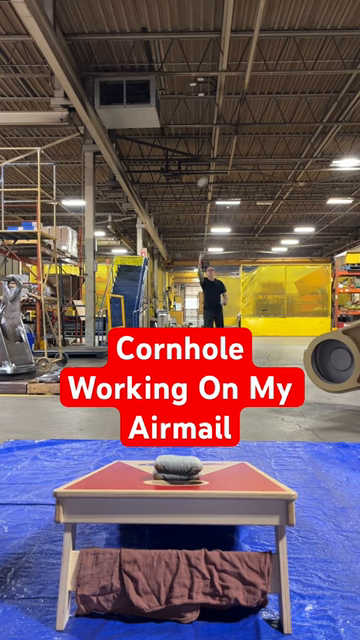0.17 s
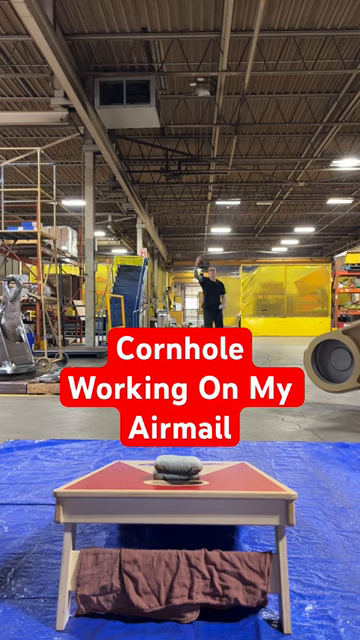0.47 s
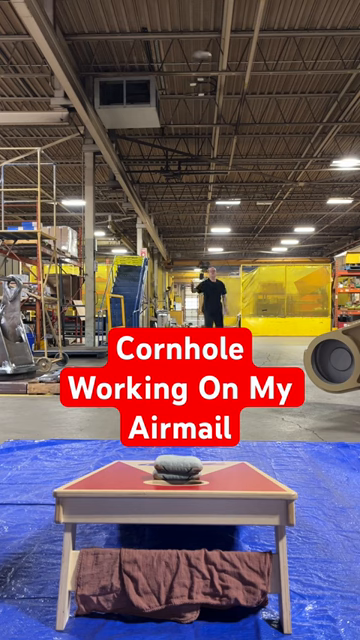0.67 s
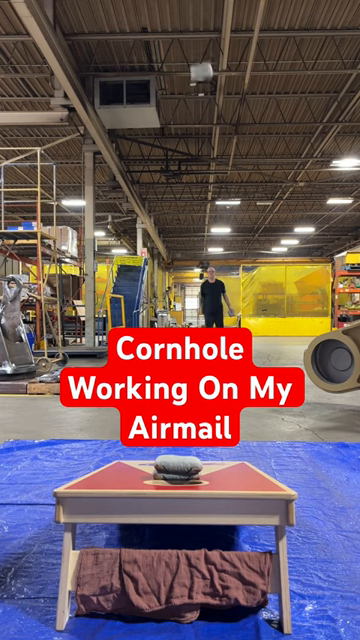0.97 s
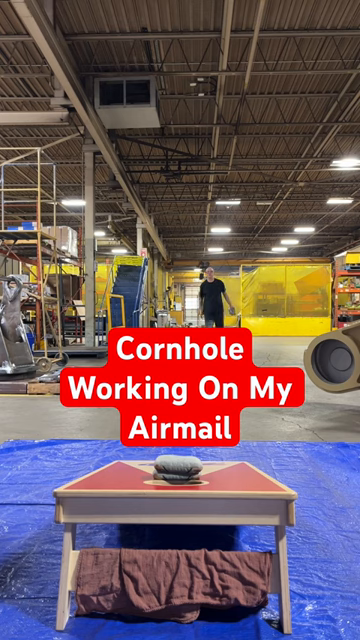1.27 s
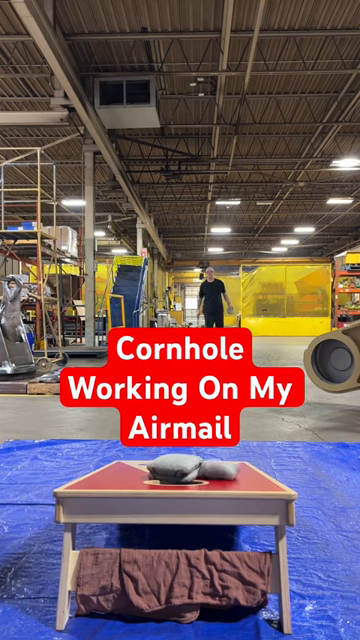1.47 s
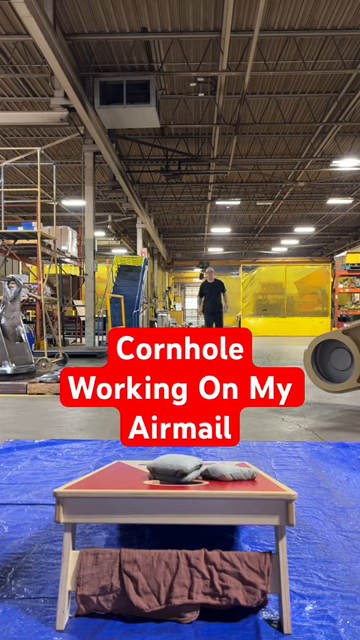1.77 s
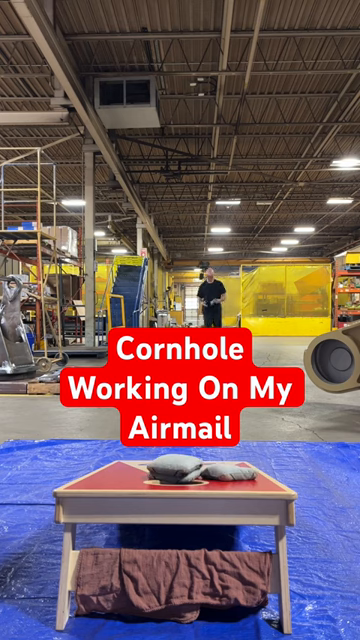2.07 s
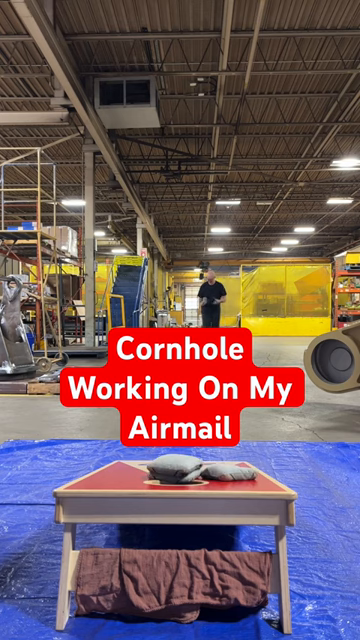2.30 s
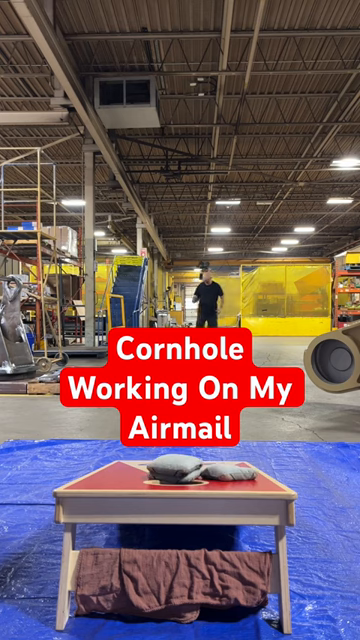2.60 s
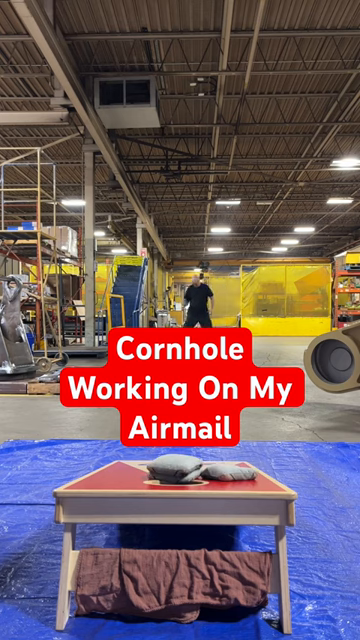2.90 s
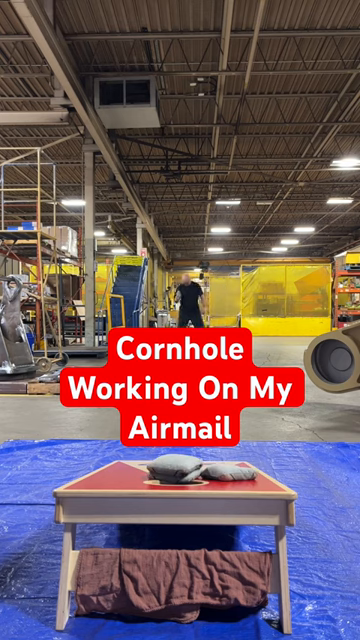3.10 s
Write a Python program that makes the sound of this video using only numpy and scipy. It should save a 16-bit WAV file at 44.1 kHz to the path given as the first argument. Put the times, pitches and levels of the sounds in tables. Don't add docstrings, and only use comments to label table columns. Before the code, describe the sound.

Steady ventilation rumble and airy rush fill a large warehouse; then one loud, woody beanbag thud lands close to a stereo phone, flops flat, and reverberates briefly before the fan noise continues alone.

```python
import sys
import numpy as np
from scipy import signal
from scipy.fft import rfft, irfft, next_fast_len
from scipy.io import wavfile
from scipy.ndimage import uniform_filter1d, map_coordinates

SR = 44100
rng = np.random.default_rng(int(sys.argv[2]) if len(sys.argv) > 2 else 0)


def int16_out(signal):
    q = np.round(np.clip(np.atleast_2d(signal).T, -1, 1) * 32767)
    wavfile.write(sys.argv[1], SR, q.astype(np.int16))


def ratio(d):
    e = np.asarray(d, float) / 20
    return 10 ** e


N = 143325


def unit(x):
    return x / np.sqrt(np.mean(x ** 2) + 1e-20)


def along(points, hz):
    f, v = np.transpose(points)
    return np.interp(np.log(hz + 1), np.log(f + 1), v)


def wobble(rate_hz):
    knots = rng.standard_normal(int(N * rate_hz / SR) + 4)
    return map_coordinates(knots, [np.arange(N) * rate_hz / SR])


def filtered(x, response):
    m = next_fast_len(N + SR // 2)
    return irfft(rfft(x, m) * response(np.fft.rfftfreq(m, 1 / SR)), m)[..., :N]


def rush(spectrum, level_db, patchy_db):
    z = signal.stft(rng.standard_normal(N + 512), nperseg=512)[2]
    field = uniform_filter1d(rng.standard_normal(z.shape), size=6, axis=0)
    field = uniform_filter1d(field, size=14, axis=1)
    noise = signal.istft(z * ratio(patchy_db * unit(field)), nperseg=512)[1][:N]
    return ratio(level_db) * unit(filtered(noise, lambda hz: ratio(along(spectrum, hz))))


def duct_drones():
    # pitch_hz, width_hz, level_db
    ducts = [(56.1, 3.3, -32), (80.1, 6, -35), (115.8, 11.5, -41.5), (289.4, 49, -46), (577, 114, -42),
             (2120, 230, -54.5)]
    drone = np.zeros(N)
    for pitch_hz, width_hz, level_db in ducts:
        noise = rng.standard_normal(N)
        mode = filtered(noise, lambda f: 1 / (1 + (2 * (f - pitch_hz) / width_hz) ** 4))
        drone += ratio(level_db) * unit(mode)
    return drone * ratio(2.2 * wobble(2.8))


def motor_whine():
    level_db = -42 + 2.5 * wobble(6)
    return ratio(level_db) * np.sin(2 * np.pi * 1313 * np.arange(N) / SR + 0.4 * wobble(8))


def fans():
    # frequency_hz, density_db (per Hz)
    rumble = [(12, -68), (28, -34), (36, -7.5), (52, -4.5), (75, 0.5), (123, -4), (220, -15), (400, -120)]
    air = [(120, -20.5), (200, -6), (247, -6), (302, -1), (580, -3.5), (729, -5), (2120, -14),
           (4890, -25.5), (7600, -39.5), (9880, -114), (16700, -120)]
    hiss = [(7000, -120), (8000, -40), (9000, -11.5), (10000, -0.5), (12700, -3.5), (14000, -9),
            (14500, -16), (14800, -120)]
    # frequency_hz, density_db (per Hz)
    rumble_side = [(20, -51), (145, 0), (296, -7), (400, -2), (770, -1), (1100, -4.5), (1640, -3.5),
                   (1800, -62)]
    air_side = [(1200, -60), (1600, -4.5), (3030, -8), (4950, -20), (6530, -22.5), (8000, -25),
                (10300, -31), (11000, -58)]
    hiss_side = [(12300, -120), (13000, -12), (13800, -2), (14400, 0), (14900, -6), (15600, -6),
                 (15900, -37)]
    # frequency_hz, share
    lean = [(150, -0.035), (700, 0.16), (1300, -0.013), (2300, 0.24), (4000, 0.48), (6500, 0.41),
            (7600, -0.097)]
    mid = rush(rumble, -24.5, 0.92) * ratio(1.3 * wobble(3.83)) + duct_drones()
    mid = mid + rush(air, -31, 0.96) + rush(hiss, -65.5, 0.4)
    side = rush(rumble_side, -32.5, 0.49) + rush(air_side, -43.5, 0.6) + rush(hiss_side, -73, 0.4)
    side = side + motor_whine()
    side = side + filtered(mid, lambda hz: along(lean, hz) * (hz < 7600))
    return np.array([mid + side, mid - side])


def answer(x, t60, gap_s):
    # frequency_hz, correlation
    alike = [(150, 1), (400, 0.32), (900, 0)]
    hz, t, z = signal.stft(rng.standard_normal((2, SR * 2)), SR, nperseg=256)
    turn = np.arccos(np.clip(along(alike, hz), -1, 1))[:, None] / 2
    mid, side = z * ratio(-60 * t / t60(hz)[:, None]) * [np.cos(turn), np.sin(turn)]
    tail = signal.istft(np.array([mid + side, mid - side]), SR, nperseg=256)[1]
    tail = tail / np.linalg.norm(tail[0])
    delayed = np.pad(x, (round(gap_s * SR), 0))
    return signal.fftconvolve(delayed[None], tail, axes=1)[:, :N]


def near_reflections(thud):
    return ratio(-10.5) * answer(thud, lambda hz: 0.067 + 0 * hz, 0.0066)


def hall(thud, rattle):
    # frequency_hz, t60_s
    decay = [(150, 0.98), (500, 1.13), (1500, 1.9), (4000, 0.83), (9000, 0.7)]
    # frequency_hz, level_db
    colour = [(100, 4), (300, 0.5), (1000, 2), (2500, 10.5), (4500, 12.5), (6500, 3), (10000, -15),
              (11500, -58)]
    blow = filtered(thud + rattle.mean(0), lambda hz: ratio(along(colour, hz)))
    return ratio(-3.5) * answer(blow, lambda hz: along(decay, hz), 0.03)


def grains(rows, colour, colour_side, spiky_db):
    t = np.arange(N) / SR
    swell = np.zeros(N)
    for start_s, rise_s, hold_s, t60_s, level_db in rows:
        fading_s = np.maximum(t - start_s - rise_s - hold_s, 0)
        swell += ratio(level_db - 60 * fading_s / t60_s) * np.clip((t - start_s) / rise_s, 0, 1) ** 1.3
    clicks = rng.standard_normal((2, N)) * ratio(spiky_db * rng.standard_normal(N))
    mid, side = filtered(clicks, lambda hz: ratio([along(colour, hz), along(colour_side, hz)]))
    return swell * unit(np.array([mid + side, mid - side]))


def dull_scuffs():
    # start_s, rise_s, hold_s, t60_s, level_db
    scuffs = [
        (1.317, .004, 0.0038, 0.034, -26.5),
        (1.345, .008, 0.011, 0.045, -48),
        (1.3765, 0.0025, 0.0062, .04, -30),
        (1.401, .003, 0.007, .05, -38),
    ]
    # frequency_hz, level_db
    dull = [(700, -62), (1300, 5.5), (2200, 1.5), (3500, -6), (5500, -12.5), (7000, -23), (8200, -80)]
    dull_side = [(700, -60), (1200, -1), (2200, -4), (3500, -7), (6000, -18), (9500, -32), (10500, -80)]
    return grains(scuffs, dull, dull_side, 6.2)


def pellet_rattle():
    # start_s, rise_s, hold_s, t60_s, level_db
    rattles = [
        (1.315, .004, 0.0052, .005, -25.5),
        (1.3213, 0.00029, 0.0014, .004, -22.5),
        (1.325, .002, 0.0044, .01, -47),
        (1.336, 0.0047, 0.021, 0.14, -55),
    ]
    # frequency_hz, level_db
    pellets = [(900, -120), (1300, 16.5), (5200, -12.5), (7000, 0), (8400, -19), (10200, 1), (13600, 2.5),
               (14700, -58)]
    pellets_side = [(900, -120), (1300, -5), (4000, -6), (8500, -1), (10800, -2), (12200, -50), (13300, -6),
                    (15300, -7)]
    return grains(rattles, pellets, pellets_side, 2.5)


def flop():
    u = np.clip((np.arange(N) / SR - 1.3768) / 0.0078, 0, 1)
    pitch_hz = 1300 * (270 / 1300) ** u * (u > 0)
    return ratio(-5.5) * np.sin(np.pi * u) * np.sin(2 * np.pi * np.cumsum(pitch_hz) / SR)


def sag(t):
    pitch_hz = np.maximum(290 - 1710 * t, 200)
    tone = np.sin(2 * np.pi * np.cumsum(pitch_hz) / SR) * (1 - np.exp(-t / 0.002))
    return ratio(-11 - 60 * t / 0.22) * tone


def board():
    # start_s, level_db, pitch_hz (of the thump), push (direction, +1 or -1)
    contacts = [(1.3179, -11, 750, 1), (1.3209, -11.5, 330, -1), (1.3228, -1.5, 329, 1),
                (1.3305, 1.5, 528, 1), (1.3334, -3.5, 380, 1), (1.3490, -19, 500, 1),
                (1.3600, -10, 306, -1), (1.3841, -2, 492, 1), (1.3938, -10, 270, -1), (1.414, -17, 198, 1)]
    # pitch_hz, level_db, t60_s
    modes = [(228, -4.5, 0.117), (305, 1.5, 0.062), (608, -8.5, 0.038), (799, 0.5, 0.053),
             (984, -13, 0.043), (1304, -12, .04), (1520, -22, .03), (2210, -18, 0.044)]
    thump_cycles = 1.55
    ring_db, longest_t60_s, soft_s = -11, 0.07, 0.00036
    out, t = np.zeros(N + SR), np.arange(SR // 2) / SR
    spot_db = rng.normal(0, 2, (len(contacts), len(modes)))
    for (start_s, level_db, pitch_hz, push), own_db in zip(contacts, spot_db):
        blow = 1.53 * np.sin(2 * np.pi * pitch_hz * t) * ratio(-20 * t * pitch_hz / thump_cycles)
        for (mode_hz, mode_db, t60_s), extra_db in zip(modes, own_db):
            t60_s = min(t60_s, longest_t60_s * 800 / mode_hz)
            decay_db = ring_db + mode_db + extra_db - 60 * t / t60_s
            blow += ratio(decay_db) * np.sin(2 * np.pi * mode_hz * t)
        rise = 1 - np.exp(-(t / soft_s) ** 2)
        out[round(start_s * SR):][:len(t)] += push * ratio(level_db) * blow * rise
    out[round(1.381 * SR):][:len(t)] += sag(t)
    return filtered(out[:N] - flop(), lambda f: 1 / (1 + (191 / (f + 1)) ** 4) / (1 + (f / 1770) ** 4))


def at_ports(thud):
    # frequency_hz, level_db
    pan = [(300, 0), (700, -2), (1300, -11), (2500, 26)]
    # frequency_hz, phase_rad
    lag = [(150, 0.1), (350, 0.62), (700, 0.53), (1300, 0.35), (2500, 0.0099), (4000, 0.13)]

    def port(k, hz):
        return ratio(k * along(pan, hz) / 2) * np.exp(-0.5j * k * along(lag, hz))

    return filtered(thud, lambda hz: np.array([port(1, hz), port(-1, hz)]))


def gain_control(x):
    # time_s, gain_db
    duck = [(0, 0), (1.318, 0), (1.345, -4.5), (1.42, -9), (1.56, -7.5), (1.63, -2.5), (1.72, -0.5),
            (3.3, 0)]
    duck_db = np.interp(np.arange(N) / SR, *np.transpose(duck))
    ends = filtered(x, lambda hz: 1 / (1 + (hz / 150) ** 4) + 0.54 / (1 + (7000 / (hz + 1)) ** 4))
    return ratio(duck_db) * (x - ends) + ratio(1.65 * duck_db) * ends


def scene():
    thud = board()
    rattle = pellet_rattle() + dull_scuffs()
    room = gain_control(hall(thud, rattle) + fans())
    return at_ports(thud) + rattle + near_reflections(thud) + room


def band_limit(x):
    return signal.sosfilt(signal.butter(12, 15750, fs=SR, output="sos"), x)


def record(dry):
    knee = 6.2
    return band_limit(dry / (1 + np.abs(dry) ** knee) ** (1 / knee))


dry = scene()
out = record(dry)
int16_out(out)
```